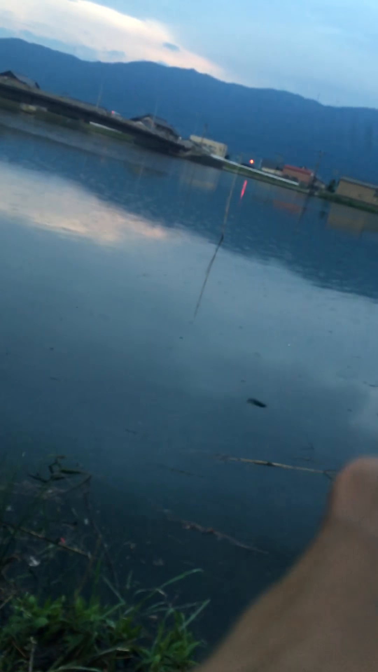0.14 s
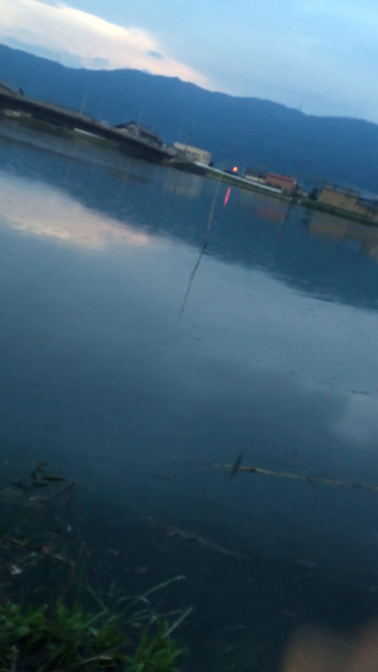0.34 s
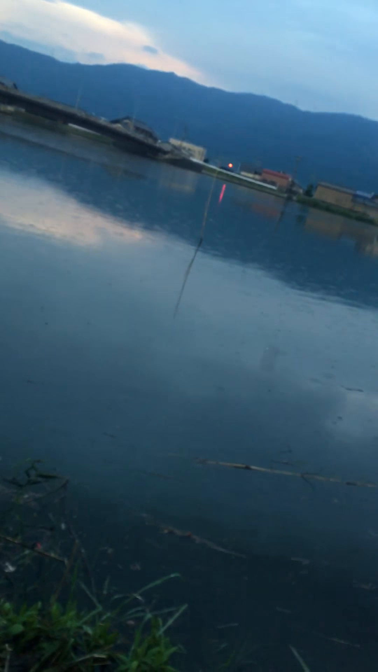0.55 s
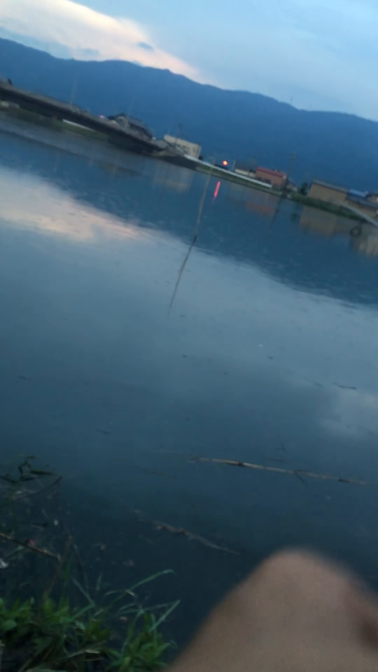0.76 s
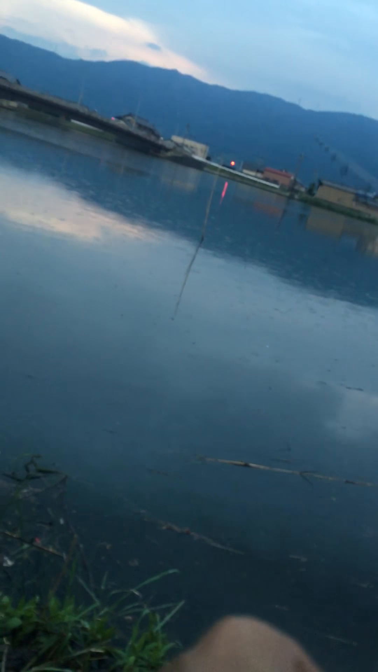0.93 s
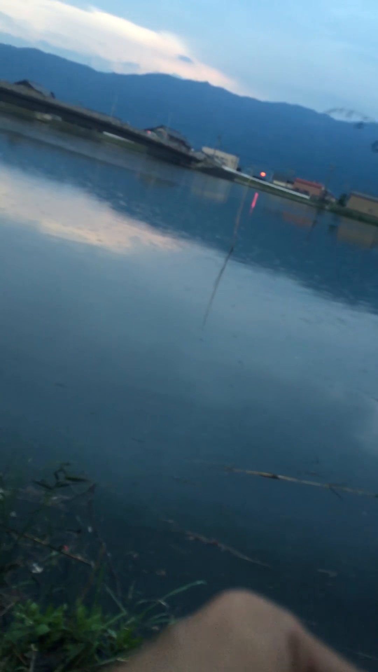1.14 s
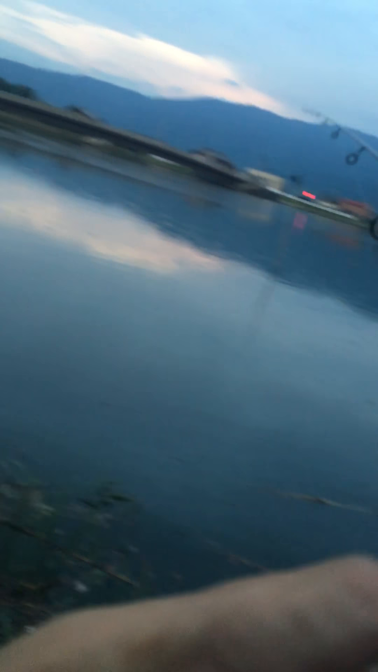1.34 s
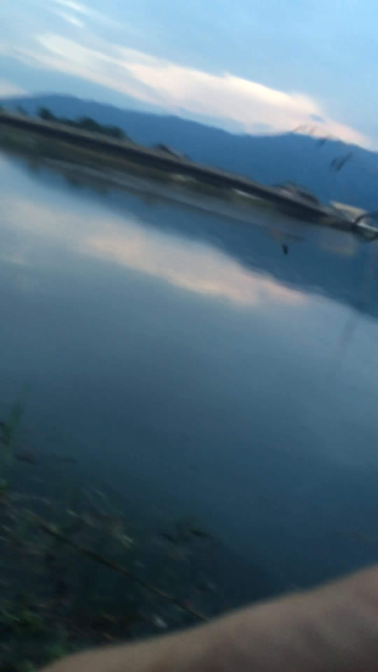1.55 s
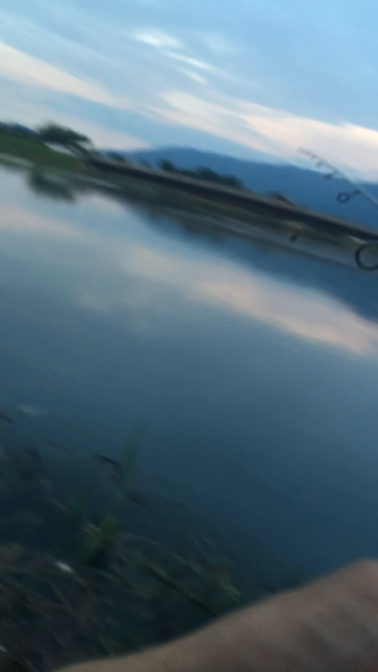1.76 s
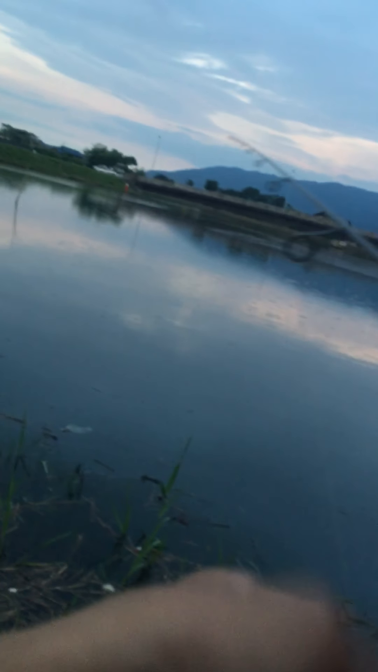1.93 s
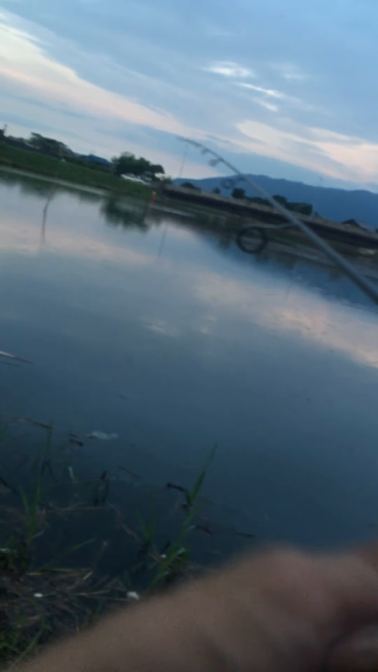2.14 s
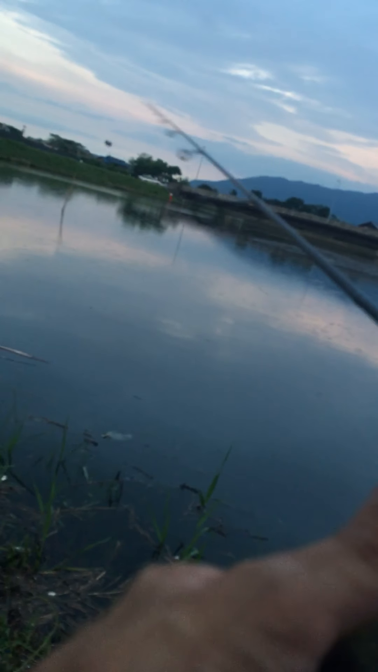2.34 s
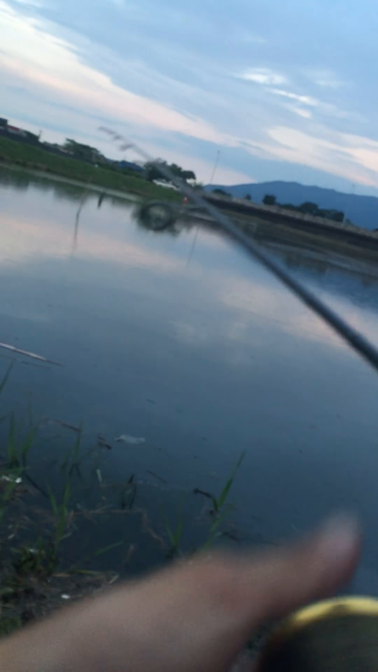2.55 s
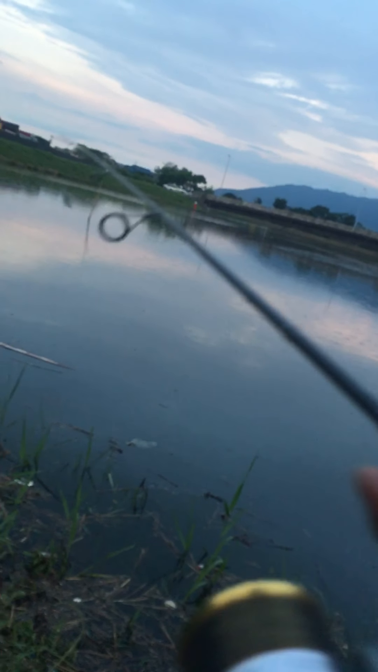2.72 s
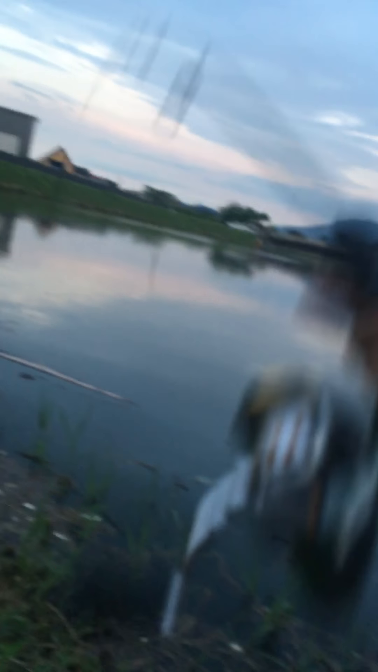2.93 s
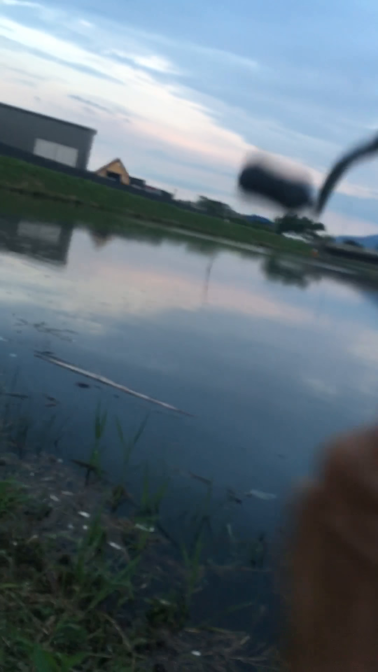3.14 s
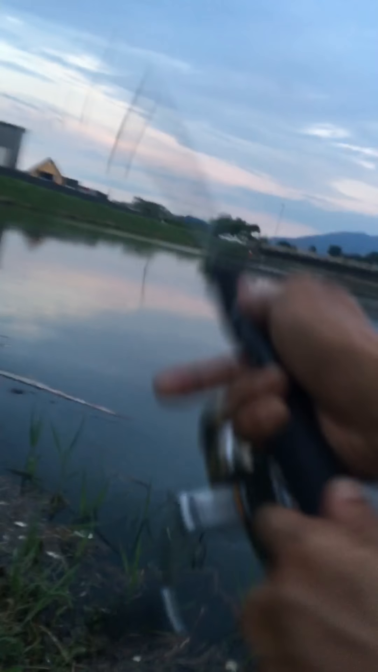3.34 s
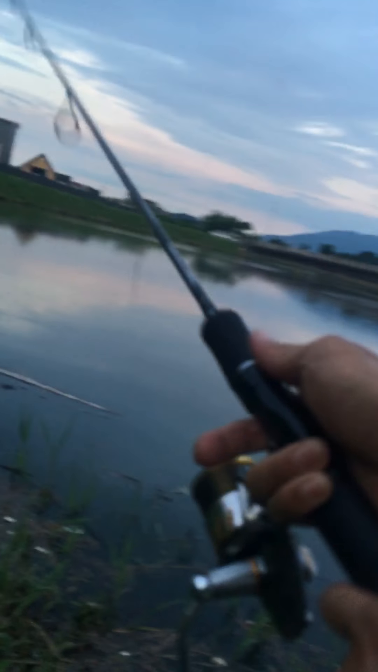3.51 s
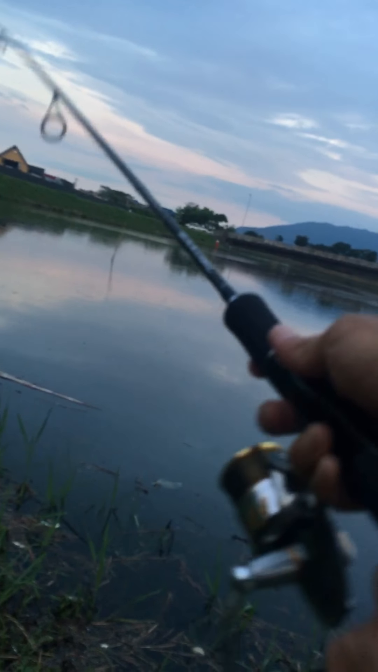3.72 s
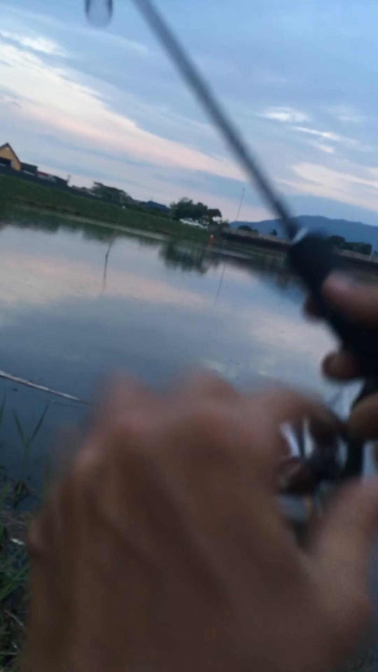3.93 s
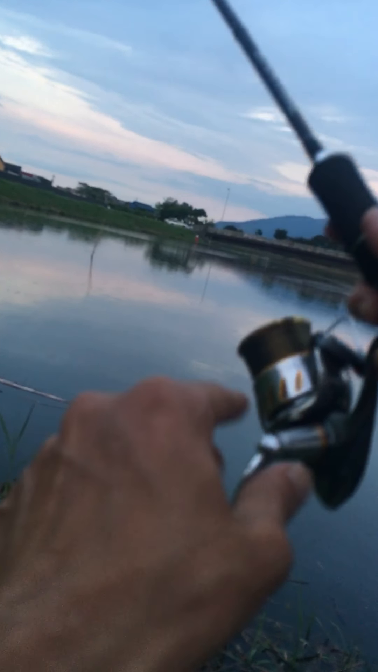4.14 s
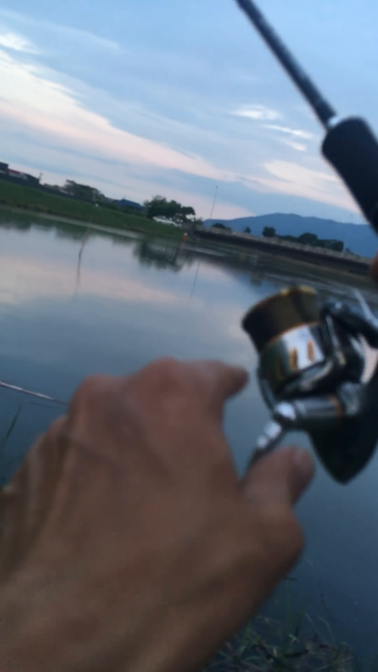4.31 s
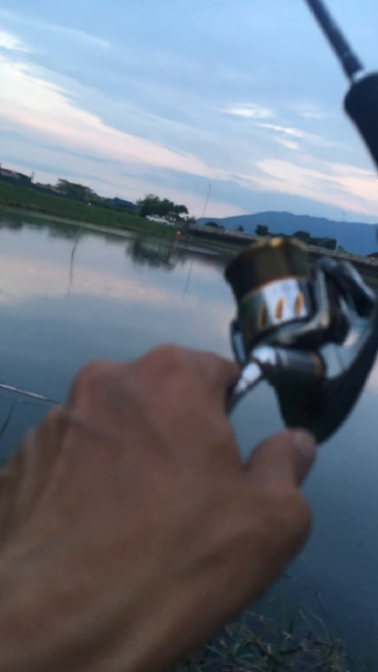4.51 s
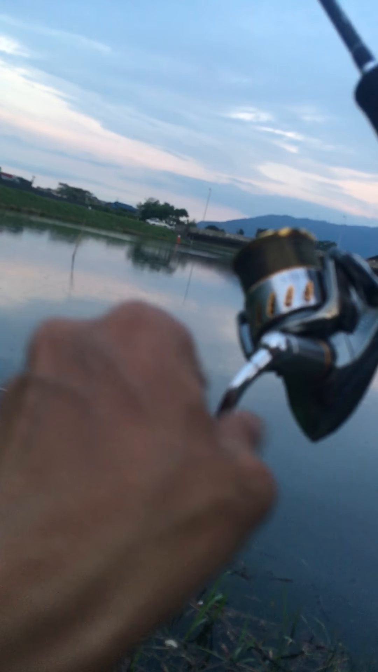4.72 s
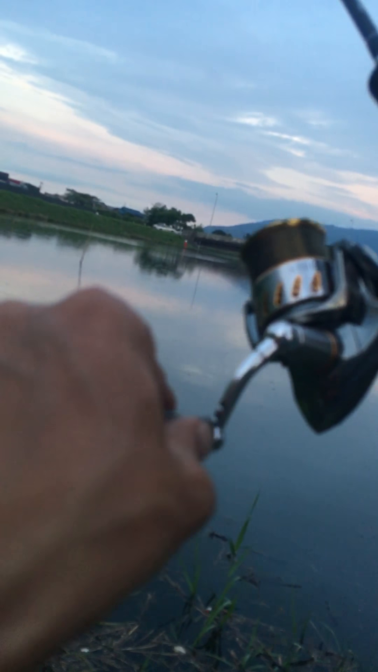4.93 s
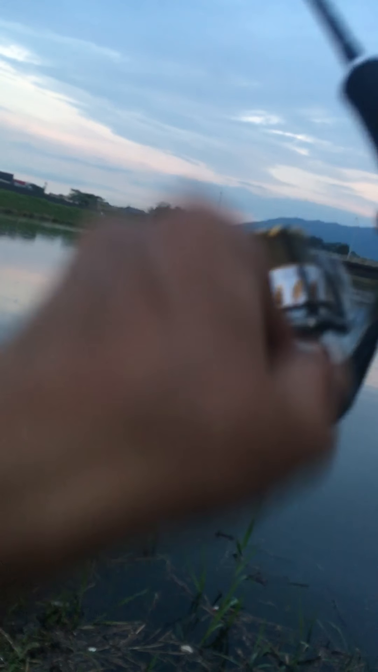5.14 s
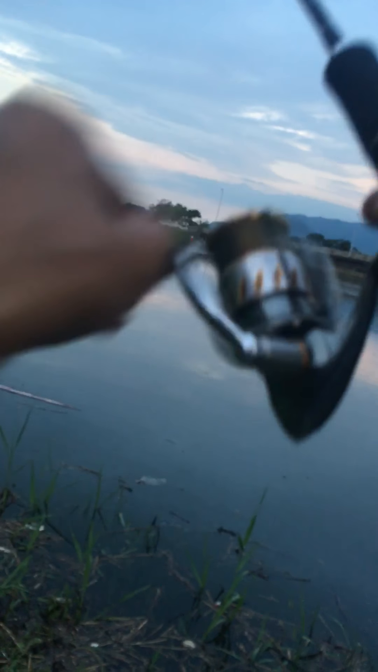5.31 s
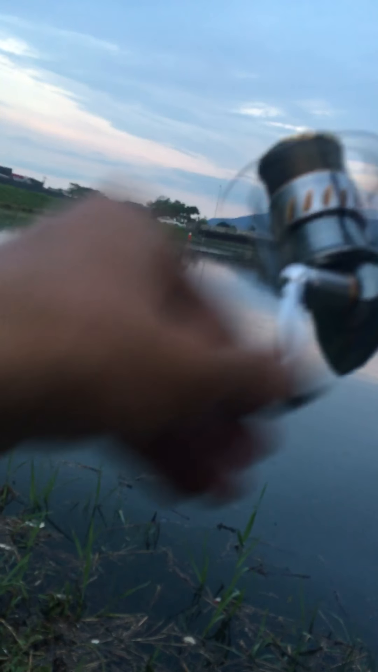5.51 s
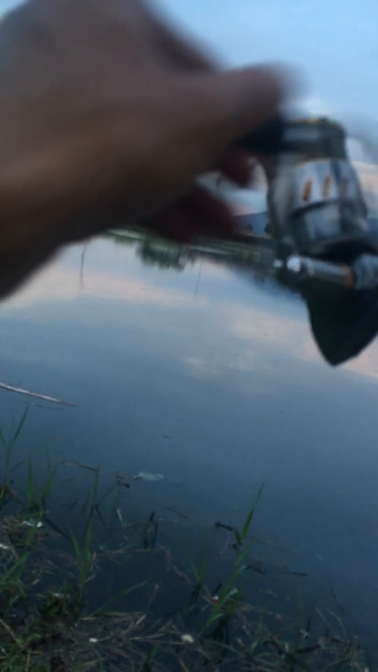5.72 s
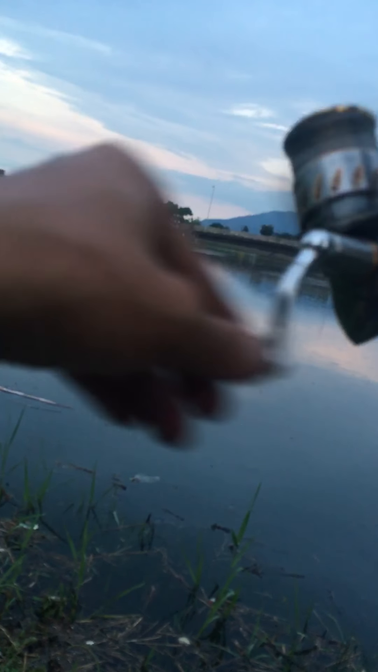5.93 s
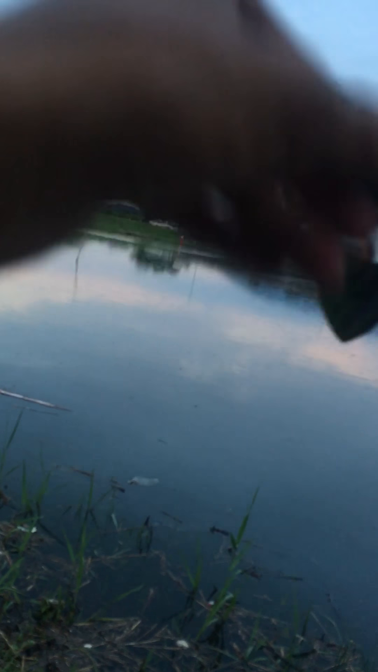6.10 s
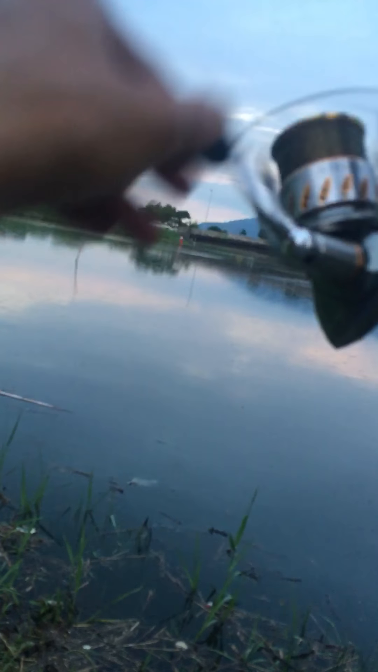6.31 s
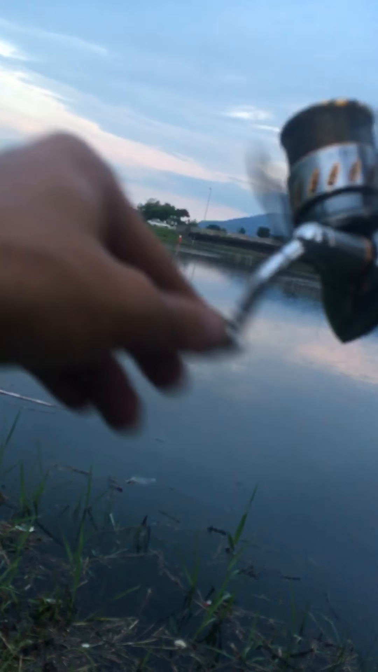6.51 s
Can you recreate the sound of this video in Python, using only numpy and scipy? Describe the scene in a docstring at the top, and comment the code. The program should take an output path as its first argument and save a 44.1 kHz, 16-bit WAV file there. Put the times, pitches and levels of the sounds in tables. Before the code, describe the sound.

By a quiet river at dusk, fishing line ticks, a reel bail clicks open, the cast hisses out falling, then the bail clacks shut and winding begins.

```python
"""Low wind and the far hum of a town open a calm river bank at dusk, with a small plop and a bird's chirp.
Fingers gather the line in ticks and strokes of noise; the bail clicks open as chatter and ringing modes.
The rod swishes as a short swell of noise; the line's hiss, moving noise bands, sinks in pitch as it slows.
The bail snaps shut and bounces while the handle is wound softly, as grainy noise that rings the reel."""
import sys
import numpy as np
from scipy import signal
from scipy.fft import rfft, irfft
from scipy.io import wavfile
from scipy.ndimage import uniform_filter1d

SR = 44100
rng = np.random.default_rng(int(sys.argv[2]) if len(sys.argv) > 2 else 0)


def output_pcm(signal):
    """Save a mono or channel-first signal as 16-bit PCM at the path in sys.argv[1].

    Samples are clipped to [-1, 1] before scaling.
    """
    pcm = np.clip(np.atleast_2d(signal).T, -1, 1) * 32767
    wavfile.write(sys.argv[1], SR, np.round(pcm).astype(np.int16))


N = 289296
TIME = np.arange(N) / SR
WINDING_S = 5.1   # the handle starts to turn; the line and the rustle of the grip stop

# Ringing modes of the reel. Each row: frequency in Hz, level in dB, ring time to -60 dB in seconds.
REEL_MODES = [(621, -11, 0.096), (803, -7.5, 0.057), (1414, -6, 0.097), (1627, -6, 0.06),
              (2131, -0.5, 0.031), (2284, 1, 0.042), (2380, 1, 0.012), (3560, -5, 0.039), (3947, 1, 0.02),
              (4330, 1, 0.03), (4430, -3.5, .045), (5220, -9.5, 0.056), (5340, -5, .04), (5580, 0, 0.041),
              (8870, -6, .035), (8150, -6, 0.045), (9660, -5, .02), (12070, -6.5, .03), (13100, -7, .025),
              (15230, -10, .012)]
# Ringing modes of the handled phone case. Each row: frequency in Hz, level in dB, ring time to -60 dB in seconds.
CASE_MODES = [(3270, -4, .008), (4230, -0.5, 0.017), (5986, 2, 0.0031), (7300, -5.5, 0.008),
              (9600, -4.5, 0.013), (12250, -4, .02)]
# Colour of rubbing skin, line and gear teeth. Each row: frequency in Hz, relative level in dB per Hz.
RUB_COLOUR = [(500, -3), (2500, -2), (4200, -3), (6100, -1.5), (10000, -2.5), (13000, -8), (16000, -4.5)]


def from_db(db):
    """Decibels to gain."""
    return 10 ** (np.asarray(db) / 20)


def rms_one(x):
    """Scale to unit power."""
    return x / np.sqrt(np.mean(x ** 2) + 1e-20)


def noise(colour):
    """Unit noise with the given colour, falling away beyond both ends."""
    hz, db = np.transpose(colour)
    bins = np.maximum(np.arange(N // 2 + 1) * SR / N, 1)
    ends = np.minimum(np.minimum(bins / hz[0], hz[-1] / bins), 1) ** 2
    tilt = from_db(np.interp(np.log(bins), np.log(hz), db))
    white = rfft(rng.standard_normal(N))
    return rms_one(irfft(white * ends * tilt, N))


def drift(rate_hz):
    """Smooth random wander of spread 1, made of noise that fades above rate_hz."""
    bins = np.arange(N // 2 + 1) * SR / N
    white = rfft(rng.standard_normal(N))
    return rms_one(irfft(white / (1 + (bins / rate_hz) ** 2), N))


def swell(s, half_s):
    """A smooth bell-shaped rise and fall round one moment."""
    return np.exp(-((TIME - s) / half_s) ** 2)


def gliding_band(hz, width_hz):
    """Unit noise gathered round a moving centre: slow noise carried by a gliding tone."""
    skirt = signal.butter(2, width_hz / 2, fs=SR, output="sos")
    slow = signal.sosfilt(skirt, rng.standard_normal((2, N)))
    phase = 2 * np.pi * np.cumsum(hz) / SR
    return rms_one(slow[0] * np.cos(phase) + slow[1] * np.sin(phase))


def ring(x, hz, t60):
    """One damped mode, scaled to pass white noise at about unchanged power."""
    radius = 10 ** (-np.log10(1000) / (t60 * SR))
    angle = 2 * np.pi * hz / SR
    feed = np.sqrt((1 - radius ** 2) / 2) * np.array([1, 0, -1])
    return signal.lfilter(feed, [1, -2 * radius * np.cos(angle), radius ** 2], x + 1e-18)


def body(force, modes):
    """The modes of a struck or rubbed part ring together, alternating in sign."""
    return sum(from_db(db) * ring(force, hz, t60) * (-1) ** k for k, (hz, db, t60) in enumerate(modes))


def bursts(times, levels_db, decays, rise_s=0.00018):
    """Envelope of contacts that start sharply and die away; overlaps add in power."""
    power, age = np.zeros(N), np.arange(SR // 10) / SR
    for s, db, decay in zip(times, levels_db, decays):
        at = int(s * SR)
        shape = from_db(db) * (1 - np.exp(-age / rise_s)) * np.exp(-age / decay)
        power[at:at + len(age)] += shape[:N - at] ** 2
    return np.sqrt(power)


def wind():
    """Rumbling noise in small gusts, strongest at the start before the breeze settles."""
    # Colour of the rumble. Each row: frequency in Hz, relative level in dB per Hz.
    rumble_colour = [(20, -29.5), (32, -15), (48, -3), (63, 1), (90, -1), (125, -4), (170, -9), (250, -12),
                     (450, -27.5), (1000, -71.5)]
    settled_db, extra_db, settling_s, gust_db = -52, 4.5, 1.7, 1.5
    level_db = settled_db + extra_db * np.exp(-TIME / settling_s)
    return from_db(level_db + gust_db * drift(9.8)) * noise(rumble_colour)


def town():
    """A distant hum of broad noise and a faint narrow tone, wavering and slowly fading."""
    # Colour of the hum. Each row: frequency in Hz, relative level in dB per Hz.
    hum_colour = [(150, -2), (330, 3), (480, -2), (630, 4), (780, -0.5), (1000, -5), (1250, -6),
                  (1450, -4.5), (1580, -7.5), (1720, -10), (1900, -7.5), (2300, -11.5), (2800, -22.5),
                  (5000, -30)]
    start_db, fade_db_per_s, waver_db = -58.4, 0.32, 0.5
    drone_hz, drone_db = 1690, -12   # level against the broad hum
    drone = from_db(drone_db) * gliding_band(np.full(N, drone_hz), width_hz=69)
    level_db = start_db - fade_db_per_s * TIME + waver_db * drift(3)
    return from_db(level_db) * (noise(hum_colour) + drone)


def steady_hiss(level_db=-65):
    """Even, broad noise before the suppressor acts on it."""
    # Colour of the hiss. Each row: frequency in Hz, relative level in dB per Hz.
    hiss_colour = [(1000, -4), (2200, 2.5), (2700, -0.5), (3200, 4), (4300, 3), (5000, -1), (6000, 2.5),
                   (8000, -3), (10000, -3), (11000, -4), (16000, -8.5)]
    return from_db(level_db) * noise(hiss_colour)


def suppressor(sound, threshold_db, hold_s=0.394, depth_db=-9.0):
    """Gain of the hiss: held down, except for a moment after a loud sound."""
    loud = uniform_filter1d(sound ** 2, size=128) > from_db(threshold_db) ** 2
    since_loud = TIME - np.maximum.accumulate(np.where(loud, TIME, -1))
    held_down = uniform_filter1d((since_loud > hold_s) * 1., size=1500)
    return from_db(depth_db * held_down)


def faint_ticks():
    """Chance contacts, spread loosely over time: rows of (s, level dB, centre Hz)."""
    ticks_per_s, middle_db, spread_db = 3.1, -53, 6
    low_hz, high_hz = 3000, 10020
    when, strength, place = rng.random((60, 3)).T
    s = (np.arange(len(when)) + when) / ticks_per_s
    db = middle_db + spread_db * (2 * strength - 1)
    hz = low_hz * (high_hz / low_hz) ** place
    return np.column_stack([s, db, hz])[s < TIME[-1]]


def ticks(snap_db=-9, decay_s=0.0022, case_db=-9, spot_db=-5, spot_cycles=7, spot_decay_s=0.00042):
    """Small contacts: a dry snap, the case's ring and a few cycles at the touched spot."""
    # The clearest ticks of line and fingers on the tackle.
    # Each row: start in seconds, level in dB before the snap and spot offsets, centre in Hz.
    clear_ticks = [(0.1033, -36, 9700), (0.1131, -35.5, 5600), (0.209, -43.5, 9800), (0.2461, -34, 9400),
                   (0.2523, -33.5, 6700), (0.5381, -40, 9710), (0.5461, -31.5, 8900), (0.567, -45, 6210),
                   (0.5843, -40, 6660), (0.7068, -44.5, 9840), (0.8685, -38.5, 9860), (0.8899, -44, 6400),
                   (0.997, -42, 6300), (1.1267, -43.5, 2600), (1.1826, -42.5, 2600), (1.204, -37, 9800),
                   (1.2246, -36, 12200), (1.2464, -41.5, 3160), (1.487, -41.5, 2640), (2.1393, -35.5, 6200),
                   (2.166, -39, 6160), (2.1953, -39.5, 4220), (2.2353, -45, 9040), (2.363, -44.5, 3580),
                   (2.609, -38.5, 3260), (2.6287, -38.5, 4120), (2.6417, -37, 9140), (3.084, -41, 11600),
                   (3.1143, -36, 11800), (3.3008, -46, 3180), (3.6676, -37.5, 9200), (3.6889, -35, 4220),
                   (4.228, -36.5, 9250), (4.804, -46.5, 3270), (5.0714, -45, 9340), (5.5855, -38.5, 9800),
                   (5.6321, -48.5, 2570)]
    # Colour of the dry snap. Each row: frequency in Hz, relative level in dB per Hz.
    snap_colour = [(600, -5), (1500, 8), (3200, -4.5), (6500, -6), (10000, -3), (12500, -15), (16000, -4)]
    contacts = np.vstack([clear_ticks, faint_ticks()])
    s, db, _ = contacts.T
    snaps = bursts(s, db + snap_db, np.full(len(s), decay_s)) * noise(snap_colour)
    out = snaps + from_db(case_db) * body(snaps, CASE_MODES)
    age = np.arange(SR // 20) / SR
    grains = rng.standard_normal((len(s), len(age)))
    for (start, level_db, centre), grain in zip(contacts, grains):
        at = int(start * SR)
        spot = ring(grain * np.exp(-age / spot_decay_s), centre, spot_cycles / centre)
        out[at:at + len(age)] += from_db(level_db + spot_db) * spot[:N - at]
    return out


def slides(grain_db=5.0, case_db=-9, grip_db=-77):
    """Soft, grainy friction on the case swells with each stroke, over a steady rustle of the grip."""
    # Strokes of skin and line.
    # Each row: centre in seconds, level in dB, time from the peak down to 1/e in seconds.
    hand_strokes = [(0.108, -53, 0.004), (0.514, -66, 0.18), (0.818, -71.5, 0.081), (1.225, -77, .04),
                    (1.64, -64, 0.046), (2.163, -65, 0.038), (2.646, -64, 0.02), (3.128, -61, 0.035),
                    (3.195, -55.5, .02), (4.428, -62, 0.042), (4.946, -64.5, 0.015)]
    strokes = sum(from_db(db) * swell(s, half_s) for s, db, half_s in hand_strokes)
    grip = from_db(grip_db) * (TIME < WINDING_S)
    friction = noise(RUB_COLOUR) + from_db(case_db) * body(noise(RUB_COLOUR), CASE_MODES)
    grainy = rms_one(friction * from_db(grain_db * drift(250)))
    return np.hypot(strokes, grip) * grainy


def plop(s=0.478, hz=650, level_db=-43.5, half_s=0.0059):
    """A small plop on the water: one very short swell of a low tone."""
    return from_db(level_db) * swell(s, half_s) * np.sin(2 * np.pi * hz * TIME)


def bird():
    """A far chirp: one swell of a rough, narrow noise band, falling in pitch."""
    middle_s, half_s, level_db = 0.94, 0.031, -62
    middle_hz, fall_octaves_per_s = 3560, 8
    pitch_hz = middle_hz * 2 ** np.clip(fall_octaves_per_s * (middle_s - TIME), -1, 1)
    rough_hz = pitch_hz * (1 + 0.074 * drift(75))
    return from_db(level_db) * swell(middle_s, half_s) * gliding_band(rough_hz, width_hz=710)


def bail(contacts, colour, crack_db, body_db, rattle_db, rattle_s, rebound_db):
    """Each contact is a metallic chatter with one rebound; it knocks the reel and leaves loose parts buzzing."""
    rebounds = np.array(contacts) + [0.0044, rebound_db, 0, 0]   # 4.4 ms later and weaker
    s, db, decay, push_db = np.vstack([contacts, rebounds]).T
    crack = bursts(s, db + crack_db, decay) * noise(colour)
    knocks = np.zeros(N)
    late = rng.integers(0, 12, len(s))   # small random delay of each knock, up to 11 samples
    strength = from_db(db + push_db + body_db) * np.sqrt(decay * SR / 2)
    knocks[(s * SR).astype(int) + late] = strength
    rattle = bursts(s, db + rattle_db, np.full(len(s), rattle_s)) * noise(colour)
    return crack + body(knocks, REEL_MODES) + rattle


def bail_opening():
    """The bail is lifted and latches open in a quick run of contacts."""
    # Each row: start in seconds, base level in dB, chatter decay in seconds, relative push on the reel in dB.
    latch_contacts = [(2.6617, -20.5, 0.00046, -4), (2.6673, -29, 0.0022, -5), (2.6795, -39.5, 0.0018, -4),
                      (2.6877, -7, 0.00045, -27), (2.6957, -31, 0.0015, -30.5),
                      (2.6985, -12.5, 0.0023, -17), (2.7018, -16, 0.00073, -20)]
    # Colour of the latch. Each row: frequency in Hz, relative level in dB per Hz.
    latch_colour = [(250, -13.5), (500, -42.5), (900, 1), (1500, -5.5), (2000, -8.5), (2400, -12),
                    (3000, -15), (4200, 5), (4900, -3), (6000, 5), (7300, 7.5), (9200, -1), (10600, 5),
                    (13300, -7), (16000, -5)]
    return bail(latch_contacts, latch_colour, crack_db=1, body_db=-15,
                rattle_db=-23, rattle_s=0.006, rebound_db=-20)


def line_hiss(hz, octaves, fast_width_hz=4600, slow_width_hz=1700, rub_db=-11):
    """Coils brush the spool lip; their hiss sinks, fades and narrows as the line slows."""
    top_db, db_per_octave = -45, 18.5   # hiss at top speed, and its fall as the line slows
    speed = np.clip((hz - hz.min()) / np.ptp(hz), 0, 1)
    # two stretches of loose line flap, each with its own wandering pitch and strength
    hiss = 0
    for stretch in range(2):
        centre = hz * (1 + 0.04 * drift(45))
        fast = np.sqrt(speed) * gliding_band(centre, fast_width_hz)
        slow = np.sqrt(1 - speed) * gliding_band(centre, slow_width_hz)
        hiss = hiss + (fast + slow) * from_db(2.2 * drift(60))
    level = from_db(top_db + db_per_octave * octaves + 2 * drift(150))
    return level * (rms_one(hiss) + from_db(rub_db) * speed * noise(RUB_COLOUR))


def swing():
    """Envelope of the rod's swish: it swells, holds briefly and dies away."""
    start_s, level_db = 3.398, -43.5   # start of the hold
    rise_s, hold_s, fall_s = 0.015, 0.036, 0.018
    before = np.maximum(start_s - TIME, 0)
    after = np.maximum(TIME - start_s - hold_s, 0)
    return from_db(level_db) * np.exp(-before / rise_s - after / fall_s)


def cast():
    """Line streams off the spool while noisy eddies sound round the swung rod and the flying line."""
    # The line's speed sets the pitch of its hiss. Each row: time in seconds, middle pitch of the hiss in Hz.
    line_pitch = [(3.33, 11500), (3.42, 15700), (3.68, 16300), (3.95, 11300), (4.22, 8200), (4.35, 5900),
                  (4.45, 6700), (4.59, 6700), (4.68, 4800)]
    # Colour of air round rod and line. Each row: frequency in Hz, relative level in dB per Hz.
    swish_colour = [(150, 11.5), (400, 3), (1100, 1.5), (2100, -1.5), (3000, -8), (3900, -7), (5100, -1),
                    (6500, -9.5), (10000, -6), (16000, -14)]
    release_s, payout_rise_s = 3.296, 0.23   # the line is let go and the stream of coils builds up
    flutter_db, flutter_db_per_octave = -61.5, 10.5   # at top speed, and its fall as the line slows
    hz = np.interp(TIME, *np.transpose(line_pitch))
    octaves = np.log2(hz / hz.max())
    running = (TIME > release_s) & (TIME < WINDING_S)
    payout = 1 - np.exp(-np.maximum(TIME - release_s, 0) / payout_rise_s)
    coils = running * payout * line_hiss(hz, octaves)
    flutter = running * from_db(flutter_db + flutter_db_per_octave * octaves)
    eddies = from_db(2.4 * drift(250)) * noise(swish_colour)
    return coils + np.hypot(swing(), flutter) * eddies


def gears(grain_db=2.5, ring_db=-6):
    """Gear teeth slide quietly, swelling once a turn and growing softer; the reel rings faintly along."""
    start_db, fade_db_per_s, rise_s = -66.5, 4.5, 0.2
    turns_per_s, turn_swell_db = 2.3, 0.5
    age = np.maximum(TIME - WINDING_S, 0)
    turning = turn_swell_db * np.cos(2 * np.pi * turns_per_s * age)
    level = from_db(start_db - fade_db_per_s * age + turning) * np.minimum(age / rise_s, 1)
    teeth = noise(RUB_COLOUR) * from_db(grain_db * drift(90))
    singing = body(teeth, REEL_MODES) * from_db(2 * drift(3))
    return level * rms_one(rms_one(teeth) + from_db(ring_db) * rms_one(singing))


def bail_closing():
    """The spring slams the bail shut and it bounces."""
    # Each row: start in seconds, base level in dB, chatter decay in seconds, relative push on the reel in dB.
    slam_contacts = [(5.1378, -15.5, 0.00075, -6.5), (5.1405, -26.5, 0.0016, 3),
                     (5.1473, -15, 0.00078, -5.5), (5.1548, -24.5, 0.0017, -2),
                     (5.1596, -19.5, 0.0011, -4.5), (5.1614, -17, 0.0018, -4), (5.1632, -11.5, 0.0025, 6),
                     (5.1676, -11.5, 0.00073, -8.5), (5.1714, -17.5, 0.0013, -2.5),
                     (5.1815, -25.5, 0.0017, -12.5), (5.1940, -25, 0.0048, 1.5), (5.1968, -23.5, 0.0016, 5),
                     (5.2125, -32, .0015, -5.5), (5.2150, -26, 0.0018, -4), (5.2256, -39.5, 0.0015, 7),
                     (5.2480, -55, .0015, 7)]
    # Colour of the clack. Each row: frequency in Hz, relative level in dB per Hz.
    clack_colour = [(180, -12.5), (300, -6), (450, -8.5), (750, -4.5), (1050, -5), (1500, 1.5), (2200, -3),
                    (2850, -6.5), (4000, 1), (5600, 1), (7200, -0.5), (10000, 1), (13000, -3),
                    (16000, -1.5)]
    return bail(slam_contacts, clack_colour, crack_db=3.0, body_db=-13.0,
                rattle_db=-27.5, rattle_s=0.016, rebound_db=-10)


def scene():
    """Everything is dry in the open air; the suppressor lets the hiss up after loud sounds."""
    outdoors = wind() + town() + plop() + bird()
    handling = ticks() + slides()
    reel = bail_opening() + cast() + gears() + bail_closing()
    sound = outdoors + handling + reel
    hiss = steady_hiss() * suppressor(sound, threshold_db=-33)
    return (sound + hiss)[None]


def record(dry):
    """A steep low-pass cuts the top above 15.8 kHz."""
    steep = signal.ellip(10, 0.1, 80, 15800, fs=SR, output="sos")
    return signal.sosfilt(steep, dry)


dry = scene()
out = record(dry)
output_pcm(out)
```